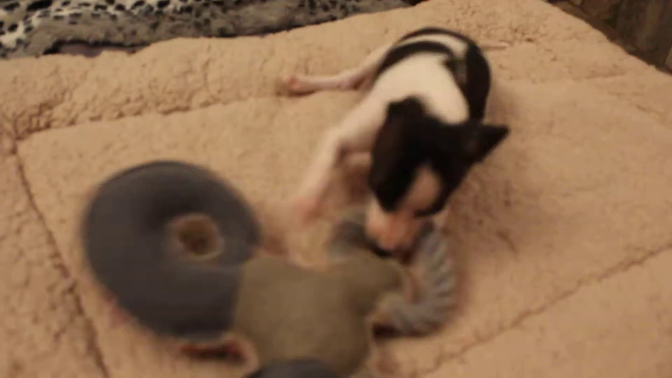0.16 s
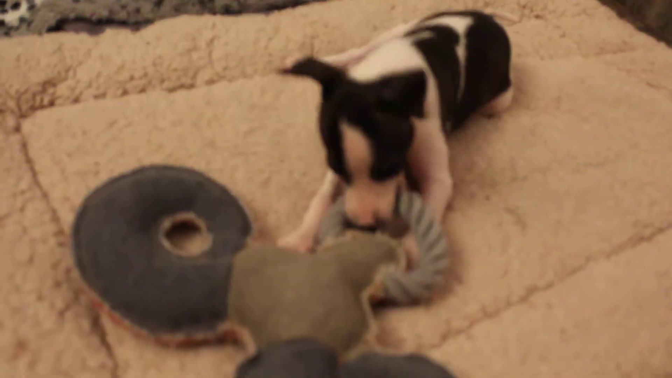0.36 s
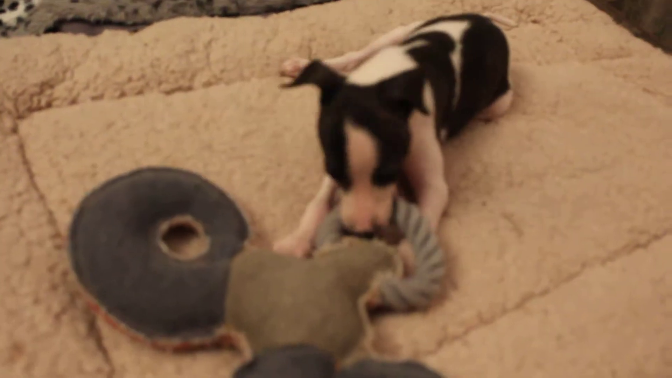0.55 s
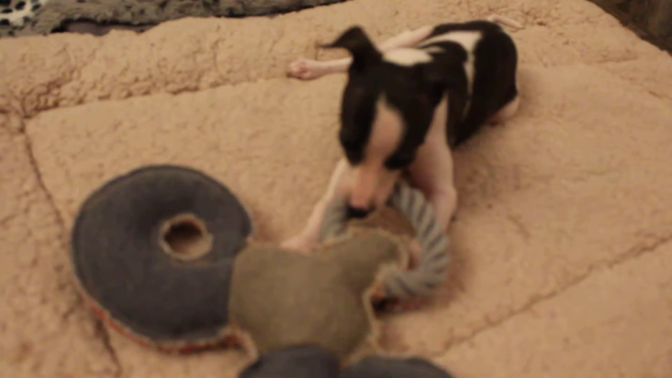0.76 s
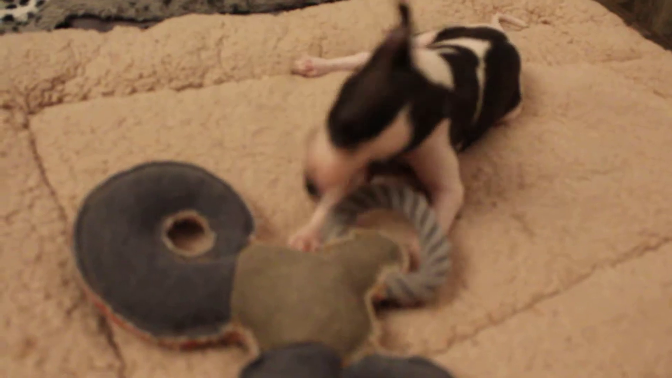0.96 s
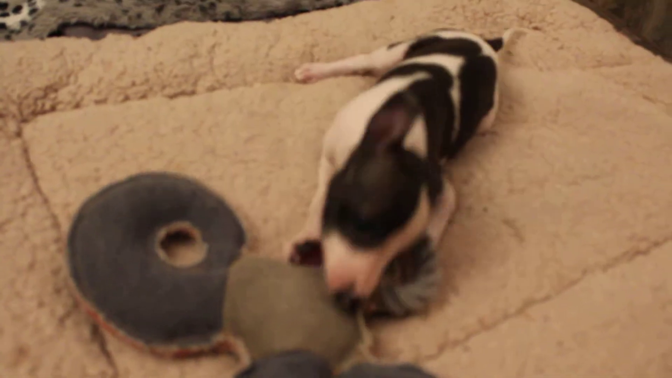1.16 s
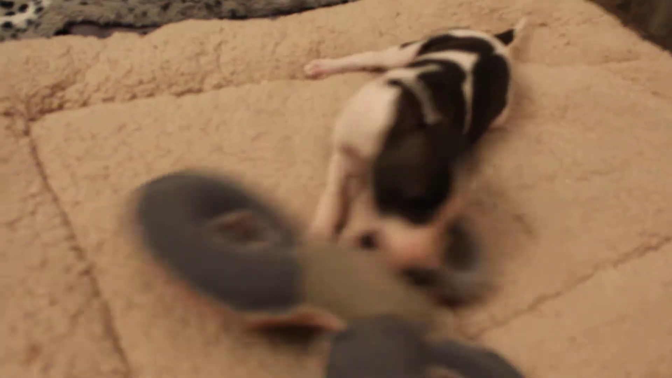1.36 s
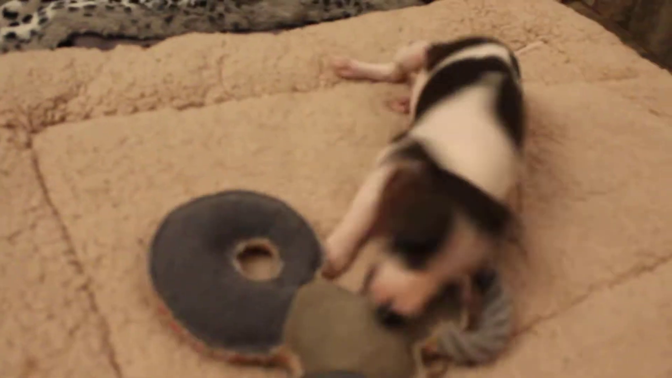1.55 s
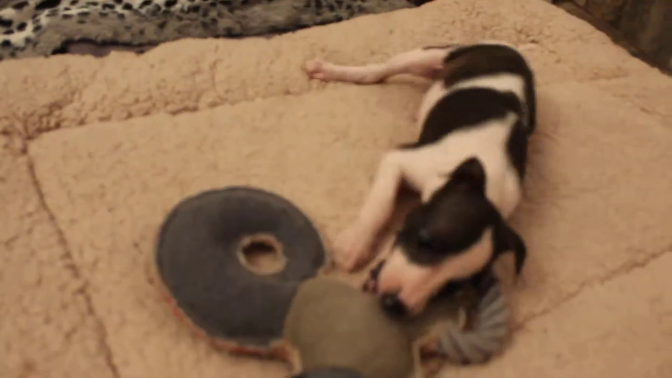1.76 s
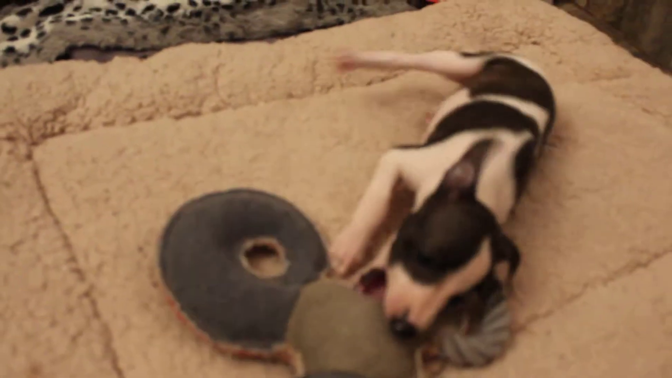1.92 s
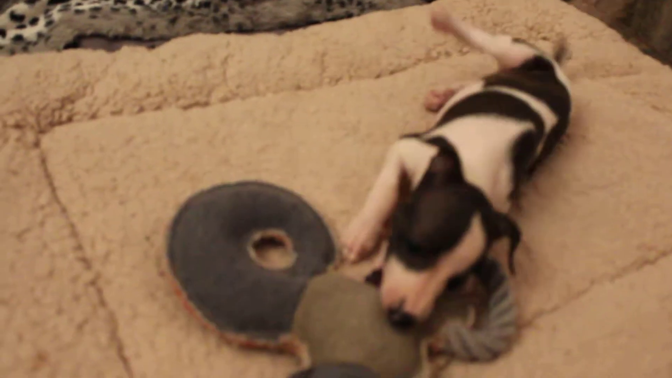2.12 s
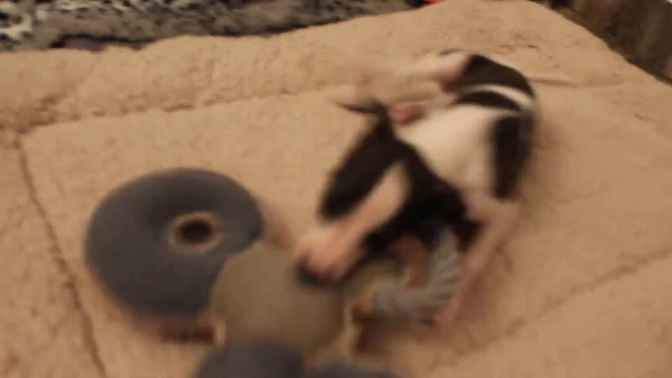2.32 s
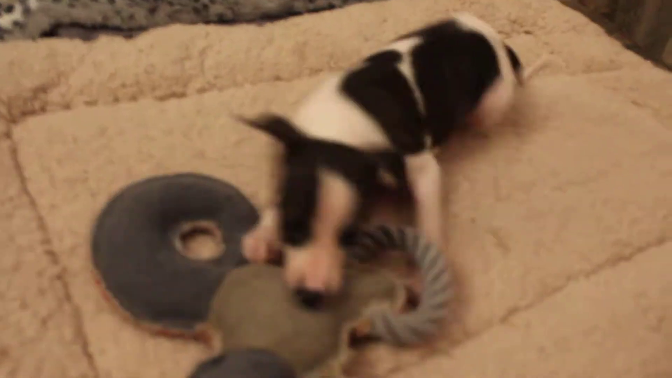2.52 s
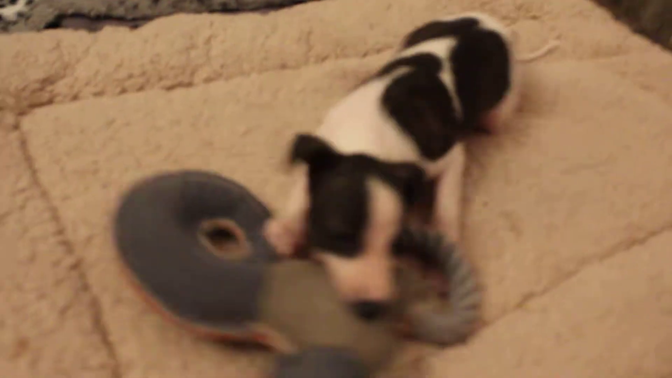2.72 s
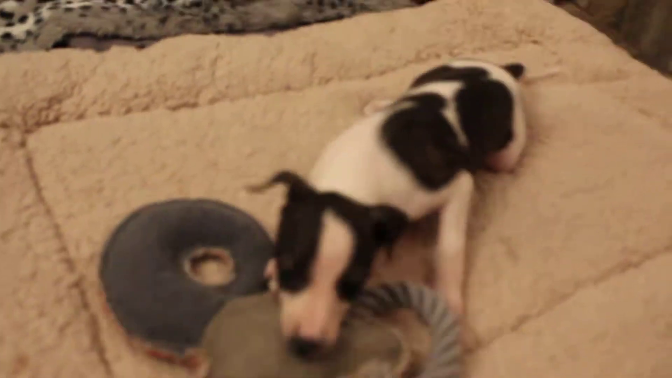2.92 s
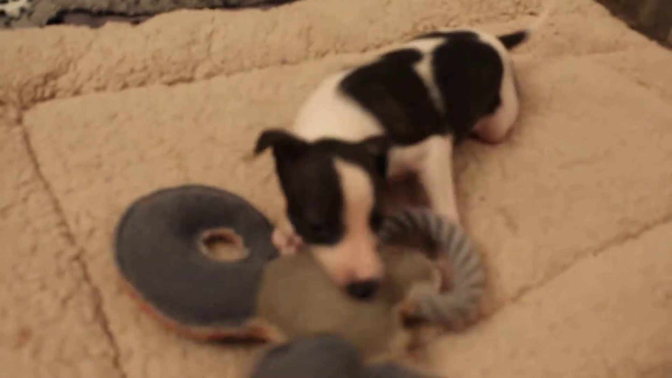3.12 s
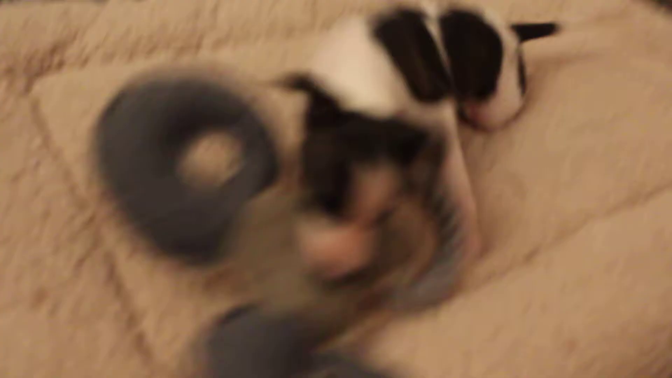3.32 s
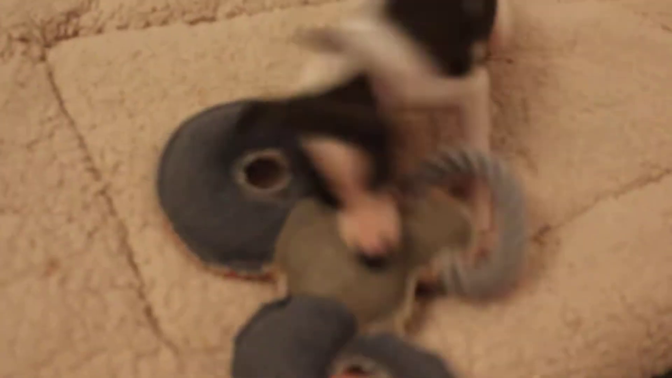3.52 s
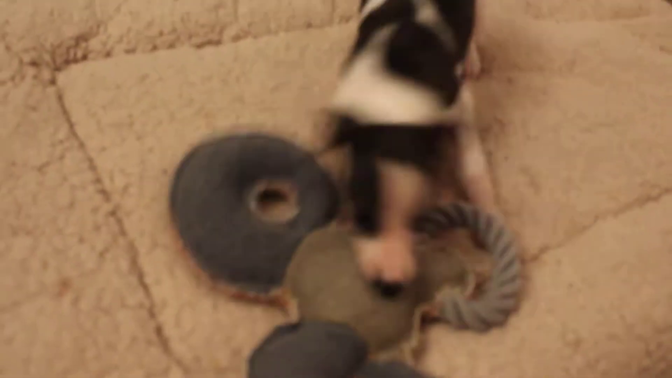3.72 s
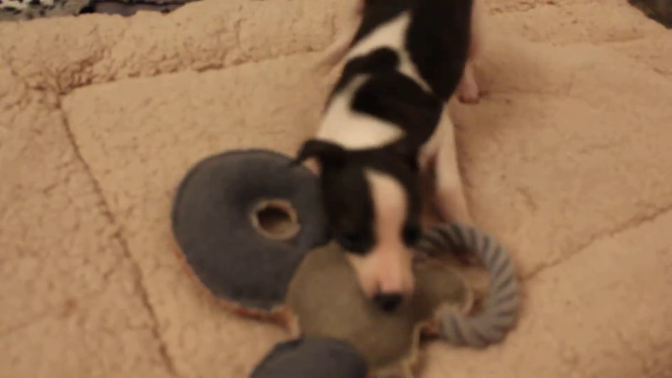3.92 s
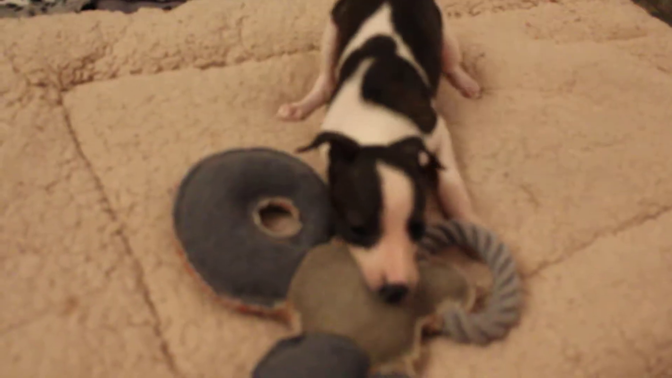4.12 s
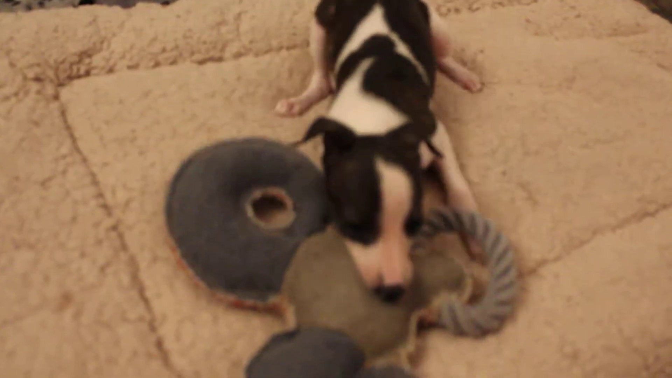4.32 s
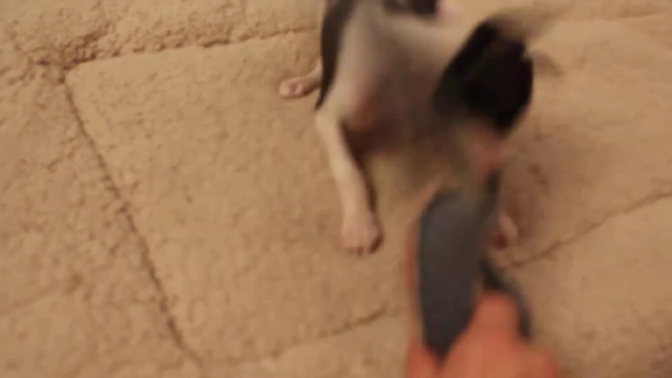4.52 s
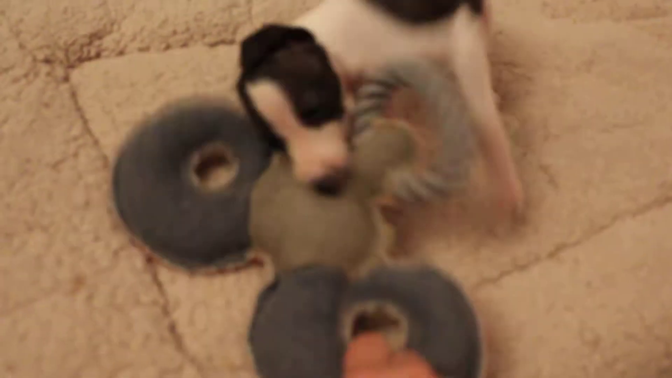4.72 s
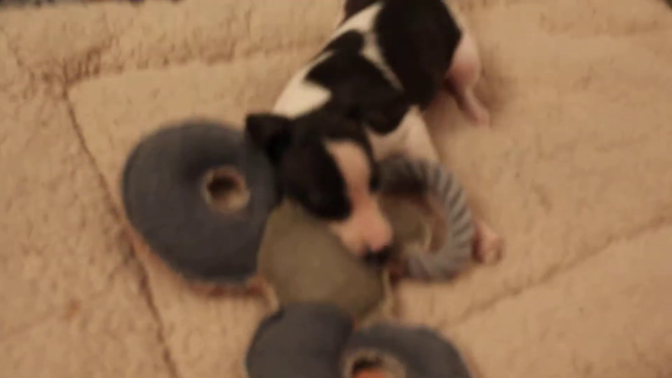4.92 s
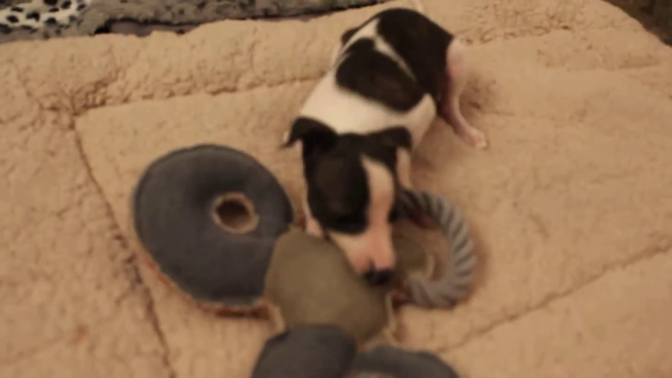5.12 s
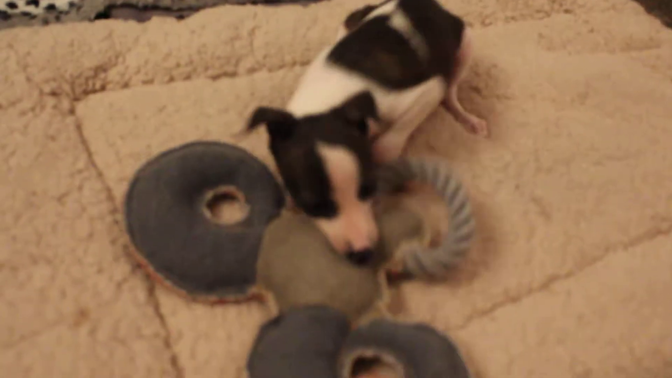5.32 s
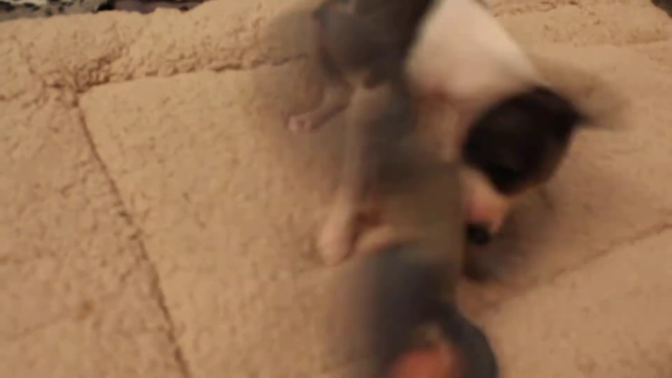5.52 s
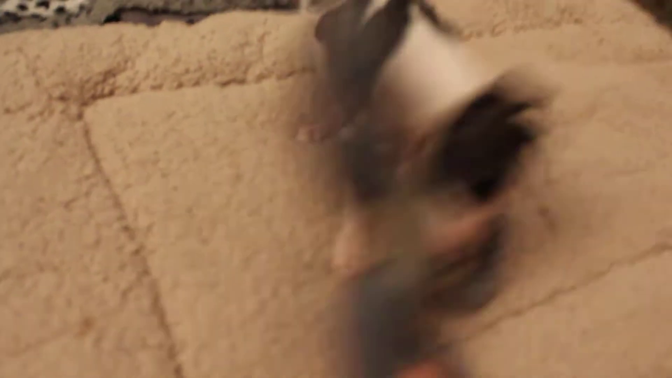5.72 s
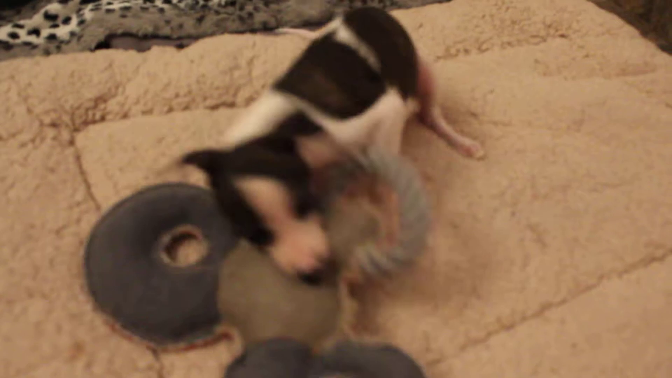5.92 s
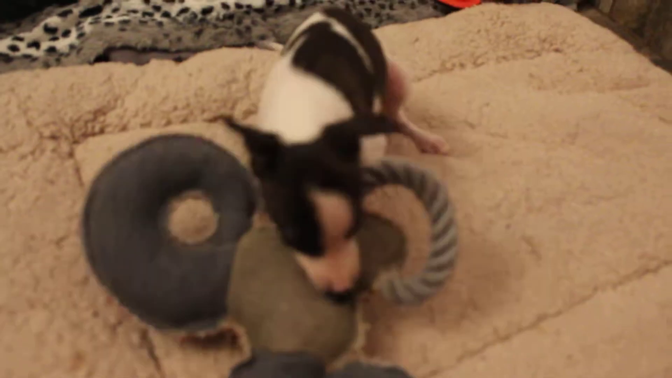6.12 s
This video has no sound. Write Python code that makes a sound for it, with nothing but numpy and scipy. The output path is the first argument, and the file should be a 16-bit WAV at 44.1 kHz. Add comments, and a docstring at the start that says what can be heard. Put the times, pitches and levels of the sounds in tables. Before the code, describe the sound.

A small puppy play-growls close by in a furnished room, with a short soft reverberation and constant light microphone hiss. A fairly high, buzzing growl runs from 0 to 0.3 seconds, then a fainter low one from 0.5 to 0.8, with light fleece scuffs. From 1.2 a low growl swells and jumps at 1.42 into a thin yap, falling into a breath puff at 1.6. Raspy, fuller growls fill 1.8-2.3 and 2.6-3.1; between them come sharp teeth clicks, a snort with a tiny whistle and a soft thump near 2.54. A higher growl rises to a yap around 3.5. After a scuff, a weak low rumble at 3.9-4.2; clicks lead to a bright rising growl at 4.5-4.8. Another low growl at 5.0-5.3, short puffs and a bump around 5.5, then a strong rough growl from 5.75 until the end.

```python
"""Puppy growling over a tug toy

A puppy tugs a soft toy on a fleece mat indoors: short low growls and higher, clearer ones, some rising to a yap.
Voice: vocal-fold slaps, hum and leaking air through resonances. Breath: noise puffs, thin sine whistles.
Teeth and claws click as short noise, paws and toy thump as dying sines, fleece scuffs as coloured noise.
A furnished room answers, over the hiss of a camera microphone."""
import sys
import numpy as np
from scipy import signal
from scipy.fft import rfft, irfft, next_fast_len
from scipy.io import wavfile
from scipy.ndimage import uniform_filter1d, map_coordinates

SR = 44100
rng = np.random.default_rng(int(sys.argv[2]) if len(sys.argv) > 2 else 0)


def digitize_waveform(pressure):
    """Quantize a signal to 16-bit integers and store it at the path in sys.argv[1].

    Rows of a 2-D input are taken as channels; values are limited to [-1, 1].
    """
    field = np.atleast_2d(pressure).T
    bounded = np.clip(field, -1, 1)
    quanta = np.round(bounded * 32767).astype(np.int16)
    wavfile.write(sys.argv[1], SR, quanta)


N = 271215  # samples


def amp(db):
    """Decibels to amplitude."""
    return 10 ** (np.asarray(db) / 20)


def unit(x):
    """Scale to rms 1."""
    return x / np.sqrt(np.mean(x ** 2) + 1e-20)


def steady(x):
    """Hold the running rms at 1 over 2600 samples."""
    return x / np.sqrt(np.abs(uniform_filter1d(x ** 2, size=2600)) + 1e-20)


def along(points, hz):
    """Interpolate (Hz, value) points on a log frequency axis."""
    f, v = np.transpose(points)
    return np.interp(np.log(hz + 1), np.log(f + 1), v)


def wobble(rate_hz):
    """Smooth random curve, rate_hz knots a second."""
    knots = rng.standard_normal(int(N * rate_hz / SR) + 4)
    return map_coordinates(knots, [np.arange(N) * rate_hz / SR])


def filtered(x, response):
    """x times a complex response of frequency."""
    m = next_fast_len(N + SR // 2)
    return irfft(rfft(x, m) * response(np.fft.rfftfreq(m, 1 / SR)), m)[..., :N]


def ring(x, modes):
    """Parallel causal resonances of alternating sign."""
    def response(f):
        total = 0
        for k, (hz, width_hz, db) in enumerate(modes):
            band = 1j * f * width_hz
            total = total + (-1) ** k * amp(db) * band / (hz * hz - f * f + band)
        return total
    return filtered(x, response)


def cavity(x, modes):
    """Steep-sided resonances: two rings in series, held at a steady level of 1."""
    wider = [(hz, 2 * width_hz, 0) for hz, width_hz, db in modes]
    return steady(ring(ring(x, modes), wider))


def noise(spectrum):
    """Noise of rms 1, coloured by (Hz, dB) points."""
    return unit(filtered(rng.standard_normal(N), lambda hz: amp(along(spectrum, hz))))


def add(out, start_s, x):
    """Mix a short sound into out at start_s."""
    out[round(start_s * SR):][:len(x)] += x


# microphone noise spectrum: freq_hz [Hz], density_db [dB, relative]
HISS_SPECTRUM = [(15, -23), (25, -5), (170, -1), (236, 5), (1610, -9), (3080, -10), (4610, -14),
                 (5000, -12.5), (5430, -14), (10100, -22), (16000, -40)]
HISS_DB = -50.5  # rms


def hiss():
    """Steady microphone self-noise: coloured Gaussian noise."""
    return amp(HISS_DB) * noise(HISS_SPECTRUM)


# room decay: freq_hz [Hz], t60_s [s]
ROOM_DECAY = [(200, 0.45), (530, 0.54), (1400, 0.35), (3700, 0.33), (10000, 0.25)]


def room(x):
    """Late reflections: decaying noise as impulse response, each frequency dying at its own speed."""
    hz, t, z = signal.stft(rng.standard_normal(SR // 2 + SR // 4), SR, nperseg=256)
    decay = amp(-60 * t / along(ROOM_DECAY, hz)[:, None])
    tail = signal.istft(z * decay, SR, nperseg=256)[1]
    delayed = np.pad(x, (300, 0))
    return signal.fftconvolve(delayed, tail / np.linalg.norm(tail))[:N]


# fleece brushed: start_s [s], peak_db [dB]
SCUFF_EVENTS = [(0.2613, -49.5), (0.388, -52.5), (0.4, -46.5), (0.7511, -51), (0.956, -41.5), (3.8728, -40),
                (4.461, -49)]
# fleece spectrum: freq_hz [Hz], density_db [dB per Hz, relative]
FLEECE_SPECTRUM = [(1060, -23), (1800, -8.5), (3730, 0.5), (5550, -9.5), (6460, -3), (15000, -35)]
SCUFF_T60_S, SCUFF_ATTACK_S = 0.21, 0.00062


def scuffs():
    """Fibre friction: flickering coloured noise, fast onset, exponential decay."""
    brush = np.zeros(N + SR)
    t = np.arange(SR // 4) / SR
    for start_s, peak_db in SCUFF_EVENTS:
        add(brush, start_s, amp(peak_db - 60 * t / SCUFF_T60_S) * (1 - np.exp(-t / SCUFF_ATTACK_S)))
    return brush[:N] * amp(2.9 * wobble(150)) * noise(FLEECE_SPECTRUM)


# paws and toy landing on the mat: start_s [s], strength_db [dB], pitch_hz [Hz]
THUMP_EVENTS = [(2.462, -17.5, 341.3), (2.536, -4, 712.3), (3.189, -18, 190.6), (3.203, -19, 281.1),
                (4.356, -24.5, 1025), (4.695, -29, 60), (5.005, -39, 324.9), (5.554, -17.5, 363)]
THUMP_CYCLES = 8  # to die by 60 dB


def thumps():
    """Soft impacts: damped sines whose onset and decay scale with the period."""
    out = np.zeros(N + SR)
    t = np.arange(SR // 4) / SR
    for start_s, strength_db, pitch_hz in THUMP_EVENTS:
        onset = 1 - np.exp(-t * pitch_hz * 2)
        decay = amp(strength_db - 60 * t * pitch_hz / THUMP_CYCLES)
        add(out, start_s, onset * decay * np.sin(2 * np.pi * pitch_hz * t))
    return out[:N]


# teeth and claws: start_s [s], level_db [dB, before the resonances], edge_db [dB over level_db]
CLICK_EVENTS = [(0.9511, -34, -39), (0.9603, -27.5, -11), (1.1771, -32, -18), (1.4247, -0.5, -48),
                (1.4489, -3, -20.5), (2.2662, 2.5, -28), (2.2785, 7, -29), (2.2918, -21, -36),
                (2.5361, -7, -29), (3.2363, -14.5, -37), (3.3685, -10, -36), (3.7439, -16.5, -35),
                (4.324, -22, -23), (4.5442, -0.5, -31), (4.5462, 4.5, -31), (4.6553, -3.5, -54),
                (5.1465, -24.5, -33), (5.4215, -14.5, -33.5)]
# body of a click: freq_hz [Hz], width_hz [Hz], level_db [dB]
ENAMEL_MODES = [(1650, 1240, 2.5), (4240, 4300, -5.5)]
# bright edge of a click: freq_hz [Hz], width_hz [Hz], level_db [dB]
EDGE_MODES = [(7400, 6100, 3.5), (12000, 11000, 0)]
CLICK_T60_S = 0.0056
KNOCK_DB, KNOCK_HZ, KNOCK_T60_S = -16, 694, 0.0037  # level over the click


def clicks():
    """Hard contacts: noise cracks through enamel and edge resonances, plus a damped sine knock."""
    snaps, edges, knocks = np.zeros((3, N + SR))
    t = np.arange(SR // 4) / SR
    for start_s, level_db, edge_db in CLICK_EVENTS:
        crack = amp(level_db - 60 * t / CLICK_T60_S) * rng.standard_normal(len(t))
        knock = amp(level_db + KNOCK_DB - 60 * t / KNOCK_T60_S) * np.sin(2 * np.pi * KNOCK_HZ * t)
        add(snaps, start_s, crack)
        add(edges, start_s, amp(edge_db) * crack)
        add(knocks, start_s, knock)
    body = ring(ring(snaps[:N], ENAMEL_MODES), ENAMEL_MODES)
    bright = ring(ring(edges[:N], EDGE_MODES), EDGE_MODES)
    return body + bright + knocks[:N]


# whistles of air in the nose: start_s [s], length_s [s], first_hz [Hz], last_hz [Hz], level_db [dB]
WHEEZE_EVENTS = [(2.442, .016, 2700, 2525, -26.5), (3.271, 0.021, 1927, 2192, -46),
                 (3.307, 0.022, 2206, 1822, -29), (3.322, .013, 2100, 2050, -40)]


def wheeze():
    """Whistling nose air: short gliding sines of flickering level."""
    flicker, out = amp(0.97 * wobble(150)), np.zeros(N)
    for start_s, length_s, first_hz, last_hz, level_db in WHEEZE_EVENTS:
        at = slice(round(start_s * SR), round((start_s + length_s) * SR))
        hz = np.linspace(first_hz, last_hz, len(out[at]))
        whistle = np.sin(2 * np.pi * np.cumsum(hz) / SR)
        out[at] += amp(level_db) * np.hanning(len(hz)) * flicker[at] * whistle
    return out


# jaws shut on the toy: freq_hz [Hz], width_hz [Hz], level_db [dB]
SHUT_MODES = [(1567, 286, 6), (2008, 536, -1.5), (3380, 700, -65.5)]
# jaws apart: freq_hz [Hz], width_hz [Hz], level_db [dB]
OPEN_MODES = [(1756, 218, 2), (2102, 215, 3), (3320, 990, -35)]


def mouth(x, hz):
    """Mouth resonance: crossfades from shut to open modes as hz rises."""
    apart = np.clip((hz - SHUT_MODES[0][0]) / (OPEN_MODES[1][0] - SHUT_MODES[0][0]), 0, 1)
    return np.sqrt(1 - apart) * cavity(x, SHUT_MODES) + np.sqrt(apart) * cavity(x, OPEN_MODES)


# puffs of breath: start_s [s], peak_s [s], end_s [s; silent if before start_s],
# peak_db [dB], teeth_db [dB over mouth], nose_db [dB over mouth]
PANT_EVENTS = [(1.61, 1.655, 1.84, -31, -9.5, -21), (2.322, 2.396, 2.436, -28.5, -2.5, -15.5),
               (2.42, 2.46, 2.535, -37, 2.5, -35), (3.045, 3.09, 3.28, -45, -10, -10.5),
               (3.167, 3.2, 3.36, -37, -3.5, -18), (3.266, 3.312, 3.2, -39, 9.5, -25),
               (3.71, 3.761, 4.07, -42, -4, -16), (4.308, 4.337, 5.28, -49, -8, -19.5),
               (4.449, 4.523, 4.525, -42.5, -15, -6), (5.402, 5.434, 5.44, -35, -3, -9),
               (5.435, 5.462, 5.48, -37, -4.5, -12), (5.502, 5.542, 5.78, -37.5, -9, -15),
               (5.564, 5.622, 5.6, -35, -15, -8)]
# air between the teeth, breath and voice: freq_hz [Hz], width_hz [Hz], level_db [dB]
TEETH_MODES = [(3210, 227, 0.5), (3917, 1210, 6.5), (4980, 777, 13.5), (6920, 765, -11)]
# nose, breath and voice: freq_hz [Hz], width_hz [Hz], level_db [dB]
NOSE_MODES = [(7400, 1070, 17), (10200, 1060, -45)]
PUFF_FADE_DB = 16.5  # start and end under the peak


def pant():
    """Unvoiced, sputtering breath: noise through mouth, teeth and nose."""
    t = np.arange(N) / SR
    air = rng.standard_normal((3, N))
    jaws = amp(2.4 * wobble(120)) * mouth(air[0], 1800 + 150 * wobble(4))
    teeth = amp(1.8 * wobble(90)) * cavity(air[1], TEETH_MODES)
    nose, out = cavity(air[2], NOSE_MODES), np.zeros(N)
    for start_s, peak_s, end_s, peak_db, teeth_db, nose_db in PANT_EVENTS:
        at = slice(round(start_s * SR), round(end_s * SR))
        fade = np.interp(t[at], [start_s, peak_s, end_s], [1, 0, 1])
        puff = amp(peak_db - PUFF_FADE_DB * fade)
        out[at] += puff * (jaws[at] + amp(teeth_db) * teeth[at] + amp(nose_db) * nose[at])
    return out


def phrases(tables):
    """Gate open inside each table, number of the table, one value per sample for each column."""
    t = np.arange(N) / SR
    s, *columns = np.transpose(np.concatenate(tables))
    gate = sum((t >= rows[0][0]) & (t <= rows[-1][0]) for rows in tables) > 0
    which = np.searchsorted([rows[0][0] for rows in tables[1:]], t)
    return uniform_filter1d(gate * 1., size=160), which, [np.interp(t, s, c) for c in columns]


# low growls, one table each: time_s [s], pitch_hz [Hz], chest_db [dB], mouth_db [dB over chest]
LOW_CALLS = [
    [(0.49, 194.8, -41, -26), (0.528, 220.8, -30.5, -52), (0.548, 238, -33, -31),
     (0.596, 242.3, -35.5, -34), (0.66, 229.3, -32.5, -49), (0.7, 229.3, -38, -20),
     (0.724, 227.2, -36.5, -48), (0.764, 230, -47, -10), (0.77, 226.2, -48, -18), (0.8, 225.3, -59, -10)],
    [(1.18, 209.6, -30.5, -16), (1.19, 215.2, -33, -18), (1.222, 233.3, -24.5, -14),
     (1.242, 243.7, -22.5, -20.5), (1.3, 206.7, -27, -18.5), (1.376, 210.2, -28, -14.5),
     (1.39, 212.2, -27, -26), (1.416, 262.1, -23.5, -17), (1.42, 268.7, -17, -15)],
    [(1.772, 274.6, -28, -4), (1.786, 273.5, -20, -0.5), (1.834, 289.2, -23.5, 4.5),
     (1.858, 294.3, -18, -4), (1.918, 277.2, -29, -3.5), (1.972, 244.7, -21.5, -18.5),
     (2.052, 243.1, -23.5, -13), (2.084, 240, -26, -1.5), (2.208, 230, -26, -9), (2.26, 228.4, -27.5, -9.5)],
    [(2.566, 282.2, -27.5, 6.5), (2.59, 284.5, -19.5, 2.5), (2.666, 283.5, -24, -2),
     (2.706, 296.7, -21.5, -2.5), (2.804, 292.4, -19.5, -8.5), (2.844, 289.9, -25.5, -1),
     (2.966, 286.6, -22.5, 1), (2.984, 283.1, -20, -3), (3.02, 256, -25, 2), (3.08, 228.7, -43, 1.5)],
    [(3.925, 174.9, -34, -20), (3.939, 178.9, -31.5, -11), (3.963, 186.3, -34, -17),
     (3.999, 198.0, -34, -16.5), (4.055, 196.7, -27.5, -18), (4.097, 189.7, -36, -19),
     (4.119, 189.6, -35.5, -15.5), (4.155, 185.3, -48, -18), (4.185, 187, -44, -20), (4.2, 184.8, -46, -17)],
    [(5.03, 182.2, -44, -26), (5.04, 183.6, -34.5, -15), (5.076, 190.8, -32.5, -23),
     (5.112, 201.9, -28, -15.5), (5.186, 204.8, -31, -19.5), (5.21, 206.9, -28.5, -25),
     (5.23, 215.6, -19, -17), (5.28, 227.3, -39.5, -29), (5.292, 226.5, -49, -35), (5.32, 224, -46, -27)],
]
# higher, clearer growls, some rising to a yap, one table each:
# time_s [s], pitch_hz [Hz], chest_db [dB], mouth_db [dB over chest]
HIGH_CALLS = [
    [(0.0, 392.3, -19.5, -1.5), (0.02, 386.5, -18.5, -9.5), (0.038, 360, -23.5, -8),
     (0.086, 333.3, -22.5, -11.5), (0.1, 316, -18.5, -19), (0.116, 284, -23, -24), (0.13, 264, -22.5, -17),
     (0.15, 300, -22.5, -25), (0.164, 322.5, -25, -19), (0.19, 288, -19, -25), (0.216, 312, -38, -19),
     (0.246, 301, -37, -28), (0.28, 272.7, -44, -13)],
    [(1.42, 290.3, -27, -1), (1.426, 325.8, -20.5, -5), (1.436, 383.3, -22.5, -3),
     (1.446, 430.4, -21.5, 12.5), (1.47, 483, -27, 19.5), (1.488, 472, -34, 20.5), (1.522, 437, -30.5, 11),
     (1.548, 374.4, -29.5, 14), (1.562, 357.8, -35, 10.5), (1.572, 357.6, -26.5, 7.5),
     (1.586, 371.4, -34.5, 7.5), (1.66, 351.4, -42.5, 9.5)],
    [(3.35, 334, -25, 6.5), (3.38, 385.4, -19.5, 6), (3.406, 385.8, -24, 4.5), (3.446, 360.0, -23, -5.5),
     (3.476, 383, -23, 7), (3.52, 442.5, -24, 15), (3.534, 420.5, -26, 15.5), (3.576, 311.4, -31, -5.5),
     (3.586, 303.6, -32.5, -12), (3.624, 343, -31, -8.5), (3.652, 320.5, -26.5, -4),
     (3.668, 295.5, -26, -17.5), (3.7, 299.8, -43, -7)],
    [(4.51, 256.4, -28.5, -16), (4.538, 331.6, -23, -6), (4.552, 369.8, -22, 4.5), (4.584, 389, -23, -11.5),
     (4.6, 385.7, -25, -3.5), (4.624, 382.9, -21.5, -5), (4.64, 422.3, -26, -6), (4.658, 449.2, -22.5, -2),
     (4.684, 425.6, -20.5, -3.5), (4.704, 449, -18.5, 10.5), (4.726, 411.5, -23.5, 11),
     (4.74, 418.2, -30, -19), (4.77, 351.3, -39, -6)],
    [(5.74, 253.5, -28, -18), (5.76, 253.9, -24, -7), (5.78, 261.3, -22.5, -7), (5.852, 261.3, -21.5, -9.5),
     (5.898, 339.6, -21.5, 1), (5.958, 306.7, -22, 2.5), (5.998, 276, -16, -11), (6.028, 312.2, -29.5, -11),
     (6.042, 302.1, -31, -12), (6.058, 273.7, -27, -11), (6.092, 245.6, -26.5, -9.5), (6.124, 253, -28, -5),
     (6.15, 238.5, -24, -21)],
]
# one row per call in time order, at mouth opening 0 dB:
# mouth_hz [Hz], throat_db [dB over chest], teeth_db [dB over chest], nose_db [dB over chest]
CALL_VOICES = [(1960, -17, -9.5, -26.5), (1900, -22.5, 1.5, -17), (1720, -19, -10.5, -24),
               (1900, -19, -16.5, -50), (1745, -17.5, -15.5, -30.5), (1933, -17.5, -18.5, -27.5),
               (1574, -21, -18.5, -33), (1729.6, -19, -10, -22), (1583, -14, -16.5, -32),
               (1671, -18, -11.5, -29), (1520, -22.5, -18.5, -33.5)]
# one per call in time order: roughness [0-1] at MIDDLE_HZ
CALL_ROUGHNESS = [.47, .45, .33, .68, .58, .72, .68, .45, .7, .47, .32]
# chest: freq_hz [Hz], width_hz [Hz], level_db [dB]
CHEST_MODES = [(301.5, 170, 0)]
# throat: freq_hz [Hz], width_hz [Hz], level_db [dB]
THROAT_MODES = [(701.7, 118, 22), (1154, 126, -43)]
# lips, ahead of the teeth: freq_hz [Hz], width_hz [Hz], level_db [dB]
LIP_MODES = [(4550, 2300, 0)]
MIDDLE_HZ, CLEARS_PER_HZ = 300, .003  # a higher voice is clearer
TEETH_DB_PER_DB, NOSE_DB_PER_DB, JAW_HZ_PER_DB = 1, 0.61, 8  # per dB of mouth opening
OCTAVE_LIFT_DB, OCTAVE_WIDTH_HZ = 14, 89  # throat sings out when harmonic 2 meets its resonance
RATTLE_HZ, RATTLE_DB = 72, 4  # loose tissue beats on the voice; depth scales with roughness
SMALL_HZ = 139  # so small a body sends out little below this


def growl():
    """Vocal folds slap once a cycle; rough stretches waver in period and size and leak air."""
    gate, call, (hz, chest_db, mouth_db) = phrases(sorted(LOW_CALLS + HIGH_CALLS))
    mouth_hz, throat_db, teeth_db, nose_db = np.transpose(CALL_VOICES)[:, call]
    rough = np.clip(np.take(CALL_ROUGHNESS, call) - CLEARS_PER_HZ * (hz - MIDDLE_HZ), .05, .9)
    mouth_hz = mouth_hz + JAW_HZ_PER_DB * mouth_db
    teeth_db = teeth_db + TEETH_DB_PER_DB * mouth_db
    nose_db = nose_db + NOSE_DB_PER_DB * mouth_db
    octave_miss = (2 * hz - THROAT_MODES[0][0]) / OCTAVE_WIDTH_HZ
    throat_db = throat_db + OCTAVE_LIFT_DB * np.exp(-octave_miss ** 2)

    jitter = rough ** 2 * (.17 * wobble(180) + .04 * wobble(40))
    cycles = np.cumsum(hz * np.exp(jitter)) / SR
    draws = rng.standard_normal((int(N * 600 / SR), 2))  # one row per cycle
    rattle = np.sin(2 * np.pi * np.cumsum(RATTLE_HZ * np.exp(.12 * wobble(20))) / SR)
    flutter_db = rough * (2.5 * wobble(80) + RATTLE_DB * rattle)
    shimmer_db = 2.5 * rough * map_coordinates(draws[:, 0], [cycles], order=1)
    swing = amp(flutter_db + shimmer_db)
    hum = steady(swing * np.sin(2 * np.pi * cycles))

    # a slap at each whole cycle, shared between two samples
    at = np.flatnonzero(np.diff(np.floor(cycles))) + 1
    late = (cycles[at] % 1) / (cycles[at] - cycles[at - 1])
    size = amp(.6 * flutter_db[at] + (1 + 3 * rough[at]) * draws[:len(at), 1])
    slaps = unit(np.bincount(at, size * (1 - late), N) + np.bincount(at - 1, size * late, N))
    # air rushes most just after each slap
    air = unit(rng.standard_normal(N) * np.sqrt(swing) * np.exp(-3 * (cycles % 1)))

    def source(air_share):
        """Slaps and leaking air, mixed by power."""
        return np.sqrt(1 - air_share) * slaps + np.sqrt(air_share) * air

    def radiation(f):
        """Second-order bass loss of a small body."""
        return (1j * f / (SMALL_HZ + 1j * f)) ** 2

    # a rough voice thuds in the chest, a clear one hums
    thud = cavity(source(.25 * rough), CHEST_MODES)
    chest = np.sqrt(1 - .35 * rough) * hum + np.sqrt(.35 * rough) * thud
    upper = amp(throat_db) * cavity(source(.6 * rough), THROAT_MODES)
    upper += amp(mouth_db) * mouth(source(.8 * rough), mouth_hz)
    upper += amp(teeth_db) * cavity(ring(source(.15 + .9 * rough), LIP_MODES), TEETH_MODES)
    upper += amp(nose_db) * cavity(air, NOSE_MODES)
    voice = gate * amp(chest_db) * (chest + upper)
    return filtered(voice, radiation) / np.abs(radiation(MIDDLE_HZ))


def scene():
    """Puppy, toy and mat, with the room's answer."""
    pup = scuffs() + thumps() + clicks() + wheeze() + pant() + growl()
    return (pup + amp(-10.5) * room(pup))[None]


BASS_CUT_HZ, TOP_HZ = 90, 15750


def record(dry):
    """The microphone drops the bass and hisses, the loudest peaks clip; nothing is kept above TOP_HZ."""
    thin = filtered(dry, lambda hz: (1j * hz / (BASS_CUT_HZ + 1j * hz)) ** 2)
    clipped = np.clip(thin + hiss(), -1, 1)
    return filtered(clipped, lambda hz: hz < TOP_HZ)


dry = scene()
out = record(dry)
digitize_waveform(out)
```